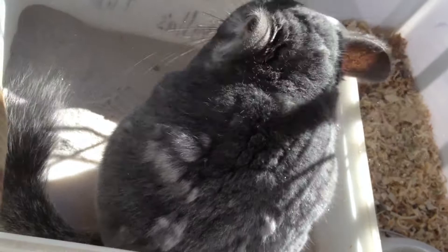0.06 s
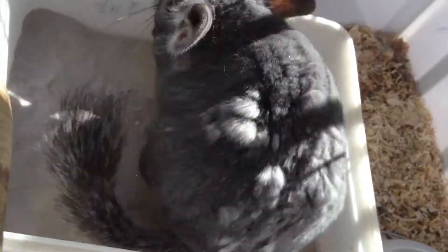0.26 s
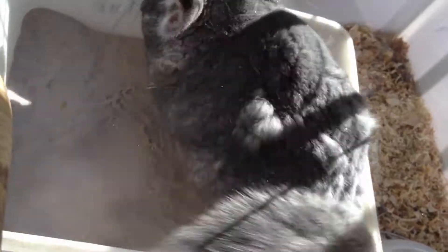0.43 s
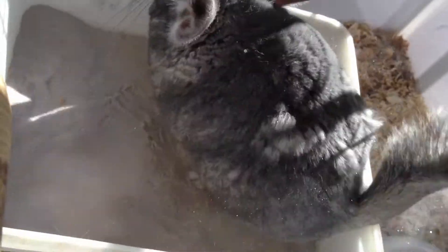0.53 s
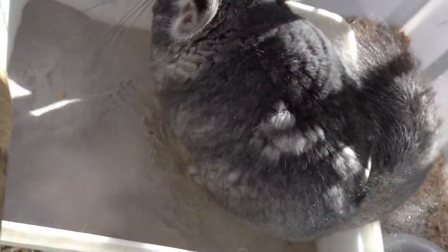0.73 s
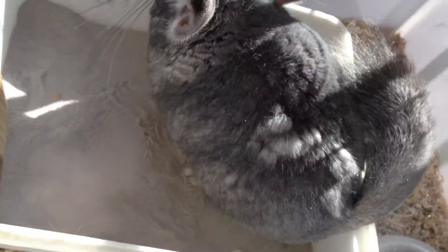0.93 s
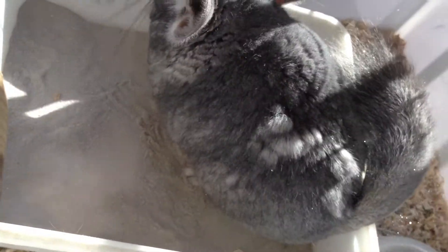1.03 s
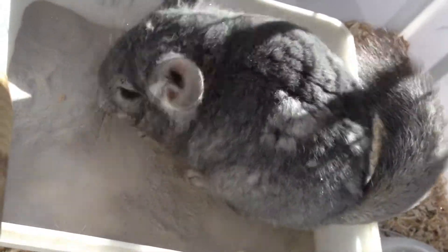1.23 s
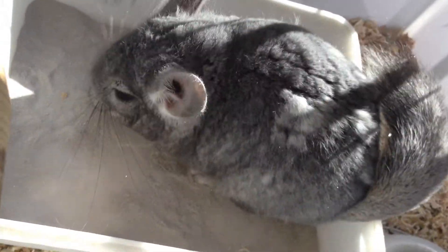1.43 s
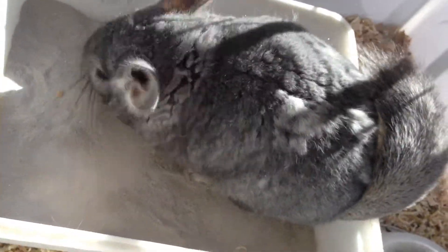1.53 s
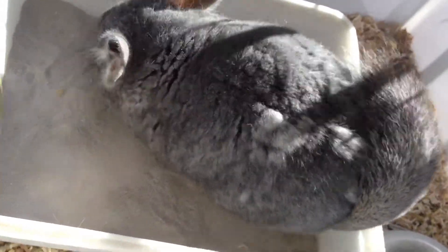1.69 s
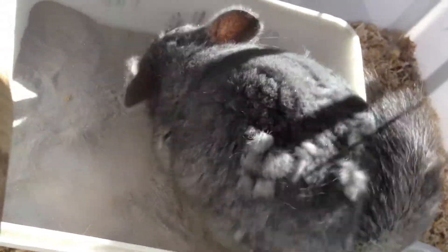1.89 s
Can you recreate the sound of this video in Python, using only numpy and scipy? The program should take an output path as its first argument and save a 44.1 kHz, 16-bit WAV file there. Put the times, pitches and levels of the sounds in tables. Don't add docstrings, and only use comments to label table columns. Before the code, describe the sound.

Animal bumping and shuffling in a plastic tub, with one loud hollow knock and soft dust scuffs.

```python
import sys
import numpy as np
from scipy import signal
from scipy.fft import rfft, irfft, next_fast_len
from scipy.io import wavfile
from scipy.ndimage import map_coordinates

SR = 44100
rng = np.random.default_rng(int(sys.argv[2]) if len(sys.argv) > 2 else 0)


def dump(signal):
    limited = np.clip(np.atleast_2d(signal).T, -1, 1)
    pcm = np.round(limited * 32767).astype(np.int16)
    wavfile.write(sys.argv[1], SR, pcm)


def boost(x):
    u = np.asarray(x, float) / 20
    return 10 ** u


N = 85995
TIME = np.arange(N) / SR


def unit(x):
    return x / np.sqrt(np.mean(x ** 2) + 1e-20)


def noise():
    return rng.standard_normal(N)


def coloured(x, points):
    size = next_fast_len(N + 8192)
    points_hz, points_db = np.transpose(points)
    hz = np.fft.rfftfreq(size, 1 / SR)
    gain_db = np.interp(np.log(hz + 1), np.log(points_hz + 1), points_db, -120, -120)
    return unit(irfft(rfft(x, size) * boost(gain_db), size)[:N])


def curve(rows, col):
    r = np.array(rows)
    return np.interp(TIME, r[:, 0], r[:, col])


def wobble(rate_hz):
    return map_coordinates(rng.standard_normal(int(2 * rate_hz) + 4), [TIME * rate_hz])


def tone(hz):
    return np.sin(2 * np.pi * np.cumsum(hz) / SR)


def ring(start_s, modes, attack_s):
    out = np.zeros(N)
    start = int(start_s * SR)
    t = np.clip(TIME[start:start + SR // 2] - start_s, 0, None)
    total = sum(boost(db - 60 * t / t60) * np.sin(2 * np.pi * hz * t) for hz, db, t60 in modes)
    out[start:start + SR // 2] = total * (1 - np.exp(-t / attack_s))
    return out


# (frequency [Hz], density [dB per Hz])
RUMBLE_COLOUR = [(20, -4), (60, -4), (110, 2), (250, -1), (500, -9.5), (1000, -11.5), (1500, -18.5),
                 (2800, -29.5)]
# (frequency [Hz], density [dB per Hz])
AIR_COLOUR = [(1500, -12), (2500, 0), (5200, -2), (6800, -1.5), (9100, -6.5), (10400, -6.5), (13000, -4),
              (15400, -2.5)]


def outdoors():
    rumble_db = -61 + wobble(24.75) / 2 + wobble(2.4) / 2
    rumble = coloured(noise(), RUMBLE_COLOUR) * boost(rumble_db)
    return rumble + coloured(noise(), AIR_COLOUR) * boost(-74.5)


# (frequency [Hz], level [dB], t60 [s])
TUB_MODES = [(138, -3, .25), (236, -7, .18), (332, -5, .14), (378, -8, .15), (420, -4, .35), (507, -3, .3),
             (590, -5, .12), (645, -7, .08), (700, -12, .1), (900, -14, .12), (1190, -24, .06),
             (1400, -24, .04)]
# (frequency [Hz], level [dB])
RATTLE_COLOUR = [(90, -37), (150, 3), (500, 0.5), (1000, -5), (1700, -19), (3000, -43)]
# (time [s], level [dB])
PRESS = [(0, -61), (.15, -65.5), (.228, -80), (.24, -43.5), (.27, -43.5), (.39, -50.5), (.42, -55.5),
         (.54, -58), (.66, -62), (.7, -54), (.76, -63), (.85, -54), (.92, -62.5), (.96, -70), (1.02, -55.5),
         (1.1, -55.5), (1.13, -72), (1.95, -69.5)]


def paw_pressure():
    loaded_t60_share, rattle_db = 0.75, -8.5
    unevenness = boost(2.9 * wobble(59.88))
    loaded = [(hz, db, t60 * loaded_t60_share) for hz, db, t60 in TUB_MODES]
    body = ring(0, loaded, 0.00026)[:SR // 2]
    pitched = unit(signal.fftconvolve(noise() * unevenness, body)[:N])
    rattle = boost(rattle_db) * coloured(noise() * unevenness, RATTLE_COLOUR)
    return (pitched + rattle) * boost(curve(PRESS, 1))


# (frequency [Hz], density [dB per Hz])
DUST_COLOUR = [(1200, -12.5), (2500, -10.5), (5200, -10.5), (7800, -3), (9150, 0), (10200, -10),
               (12500, -9.5), (15400, -13)]
# (time [s], level [dB])
SWEEP = [(0, -77), (.03, -68), (.155, -62), (.17, -74.5), (.26, -66.5), (.29, -61), (.4, -64), (.44, -66.5),
         (.54, -71.5), (.6, -77.5), (1.1, -76), (1.35, -81), (1.62, -81), (1.72, -64.5), (1.805, -65.5),
         (1.855, -68), (1.88, -55), (1.95, -49.5)]


def dust():
    grains_per_s, grain_db, grain_spread_db = 1100, -8, -1.5
    chance, size, sign = rng.random((3, N))
    grains = (chance < grains_per_s / SR) * boost(-grain_spread_db * np.log(size)) * np.sign(sign - 0.5)
    hiss = noise() * boost(2.25 * wobble(40.12))
    return coloured(hiss + boost(grain_db) * unit(grains), DUST_COLOUR) * boost(curve(SWEEP, 1))


# (frequency [Hz], level [dB])
CLAW_COLOUR = [(4000, -22), (6200, -3.5), (9100, 0.5), (10500, -8), (13500, -7.5), (15400, -8)]
# (frequency [Hz], level [dB])
SHAVINGS_COLOUR = [(900, -25), (1800, 6.5), (4500, -1), (6000, -2)]
# (time [s], level [dB], length [s], dull share [dB])
SCUFFS = [(0.036, -57.5, 0.0016, -14), (.099, -55.5, 0.0033, -8), (0.284, -54, 0.0017, -21),
          (0.294, -55, 0.0022, -26), (0.317, -59.5, 0.0077, -2.5), (0.362, -60, 0.0029, -21),
          (0.367, -58.5, 0.0082, -7), (0.383, -60, 0.0075, -0.5), (0.464, -59.5, 0.011, -5),
          (0.523, -66.5, 0.0077, -8), (0.803, -60, 0.0037, -8.5), (0.8531, -56, 0.0056, -10.5),
          (0.8864, -56, 0.0029, -7), (.897, -57.5, 0.0023, -7), (1.02, -69, 0.003, 1.5),
          (1.071, -77.5, .005, 8), (1.081, -75, 0.0025, 2), (1.167, -68.5, 0.024, -11),
          (1.245, -60.5, 0.0046, -9.5), (1.284, -64, 0.009, -6.5), (1.62, -66.5, .004, -26),
          (1.69, -78, 0.0031, -28), (1.716, -58, 0.0036, -7)]


def claw_scuffs():
    attack_s, release_share = 0.001, 0.84
    grit = boost(2.5 * wobble(1500))
    bright = coloured(noise() * grit, CLAW_COLOUR)
    dull = coloured(noise() * grit, SHAVINGS_COLOUR)
    out = np.zeros(N)
    for start_s, db, length_s, dull_db in SCUFFS:
        t = TIME - start_s
        rise = np.clip(t / attack_s, 0, 1)
        fall = np.exp(-np.clip(t - length_s, 0, None) / (release_share * length_s / 2))
        out += boost(db) * rise * fall * (bright + boost(dull_db) * dull)
    return out


# (frequency [Hz], level [dB], t60 [s])
CONTACT_MODES = [(950, -9.5, 0.0053), (1890, -16, .003), (3400, -21, .002)]
# (time [s], level [dB], frequency [Hz], t60 [s])
PAW_FALLS = [(.133, -63, 178, 0.056), (.4645, -39, 800, 0.023), (.53, -42, 200, 0.045),
             (0.6984, -40.5, 570, 0.009), (.8035, -47, 600, .015), (1.069, -47, 483, 0.018),
             (1.082, -48, 560, 0.013), (0.854, -37.5, 351, 0.054), (0.857, -40, 495, 0.088),
             (.888, -37.5, 510, 0.018), (.865, -45.5, 138.6, 0.16), (1.014, -41, 344, 0.019),
             (1.025, -44.5, 163, 0.078), (1.094, -39, 340, 0.031), (1.2471, -43.5, 602, 0.02),
             (1.284, -45.5, 526, 0.016), (1.498, -47.5, 249, 0.05), (1.69, -49, 596, 0.031),
             (1.787, -41, 243, 0.061), (1.868, -48.5, 250, 0.013)]


def paw_falls():
    tub_db = -22
    out = np.zeros(N)
    for start_s, db, hz, t60 in PAW_FALLS:
        thump = [(hz, db, t60), (hz * 1.64, db - 12.0, t60 / 2), (hz * 3.0, db - 11.5, t60 / 3)]
        out += ring(start_s, thump, 0.00051)
        out += boost(db + tub_db) * ring(start_s, TUB_MODES, 0.0024)
        out += boost(db) * ring(start_s, CONTACT_MODES, 0.00022)
    return out


# (delay [s], level [dB])
REBOUNDS = [
    (.0067, -9),
    (.0084, -13),
    (.0222, -18),
]
# (frequency [Hz], level [dB], t60 [s])
FLOOR_BOOM = (147, -26, .075)


def knock():
    knock_s, knock_db, knock_hz, knock_t60_s = 0.22992, -7, 574, 0.0071
    snap_db, ring_db, boom_lag_s = -23.5, -27, 0.0018
    free_t60_share = 0.46
    pulse = [(knock_hz, knock_db, knock_t60_s)]
    snap = [(1500, snap_db, 0.002), (3300, snap_db + 1.5, 0.001), (6300, snap_db - 13, 0.001)]
    out = -ring(knock_s, pulse + snap, 0.000093)
    for delay_s, db in REBOUNDS:
        out += ring(knock_s + delay_s, [(knock_hz, knock_db + db, knock_t60_s)], 0.00069)
    damped = [(hz, db, t60 * free_t60_share) for hz, db, t60 in TUB_MODES[1:]]
    out += boost(ring_db) * ring(knock_s, damped, 0.0043)
    return out + ring(knock_s + boom_lag_s, [FLOOR_BOOM], 0.0026)


# (time [s], length [s], frequency [Hz], level [dB])
WALL_HUMS = [(0.253, 0.058, 510.5, -45.5), (0.26, 0.04, 600, -44.5), (0.249, .05, 350, -48),
             (.26, 0.091, 378, -50), (.255, 0.069, 425, -47.5), (.258, 0.03, 134, -48.5),
             (.305, 0.039, 141.7, -46), (0.29, 0.092, 240, -51), (.32, 0.048, 500, -47),
             (0.35, 0.064, 418, -50.5), (0.35, 0.047, 870, -56), (0.36, .03, 720, -54.5),
             (.38, 0.034, 139, -51), (.435, 0.075, 136, -51.5), (0.48, 0.078, 413, -53.5),
             (0.513, .08, 345, -60), (.48, 0.033, 290, -57), (.3, .045, 600, -54), (0.29, .04, 900, -53),
             (.675, .08, 380, -58), (.69, .04, 430, -55), (.69, .09, 138, -63), (0.802, 0.032, 390, -61),
             (.82, 0.053, 510, -53), (.88, 0.038, 381, -55.5), (.955, 0.044, 375, -59.5),
             (.893, .035, 522, -50), (1.04, 0.028, 502, -59)]


def rocking():
    edge_s, rough_db, rough_rad = 0.011, 1.5, 0.3
    out = np.zeros(N)
    for start_s, length_s, hz, db in WALL_HUMS:
        t = TIME - start_s
        swell = np.clip(np.minimum(t, length_s - t) / edge_s, 0, 1)
        level = boost(db + rough_db * wobble(70))
        out += level * swell * np.sin(2 * np.pi * hz * t + rough_rad * wobble(49.8))
    return out


# (time [s], level [dB], frequency [Hz])
TICKS = [(.2935, -57, 9300), (.4647, -53, 2300), (.621, -67, 9000), (.8035, -58, 9150), (.6988, -56, 2150),
         (.699, -63, 3700), (.804, -62, 1900), (1.021, -62, 1800), (1.069, -60, 1900), (1.084, -62, 2000),
         (.8555, -54, 9100), (.8885, -55, 9200), (.472, -58, 4800), (1.246, -63, 6500), (1.285, -63, 7600),
         (1.6215, -61, 14000), (1.6755, -65, 11500), (1.6845, -60, 14200)]


def grit_ticks():
    return sum(ring(start_s, [(hz, db, 0.012), (hz * 0.88, db + 1.5, 0.008)], 0.00037)
               for start_s, db, hz in TICKS)


# (frequency [Hz], level [dB], t60 [s])
WIRE_MODES = [(7950, 0, .12), (8820, 2, .12), (10600, -2, .11)]
# (time [s], level [dB])
PINGS = [
    (.803, -71),
    (.855, -71),
    (.889, -63),
]


def wire_clip():
    return sum(boost(db) * ring(start_s, WIRE_MODES, 0.0011) for start_s, db in PINGS)


# (time [s], frequency [Hz], level [dB])
SQUEAK = [
    (.89, 8900, -77),
    (.935, 8620, -74),
    (.952, 8260, -65.5),
    (.966, 8140, -84),
    (.975, 8250, -66),
    (.995, 8100, -71),
    (1.008, 7900, -88),
    (1.03, 7400, -83),
    (1.055, 7300, -92),
]


def rim_squeak():
    on = (TIME > SQUEAK[0][0]) * (TIME < SQUEAK[-1][0])
    level_db = curve(SQUEAK, 2) + 0.5 + 1.5 * wobble(170)
    return on * boost(level_db) * tone(curve(SQUEAK, 1))


# (time [s], frequency [Hz], level [dB])
BIRD = [
    (.89, 4250, -81),
    (.92, 4440, -70),
    (.955, 4370, -76),
    (.965, 4400, -79),
    (.985, 4500, -69.5),
    (1.015, 4380, -75),
    (1.04, 4230, -91.5),
]


def far_bird():
    return boost(curve(BIRD, 2) + 2.5 * wobble(200)) * tone(curve(BIRD, 1) + 90 * wobble(500))


# (frequency [Hz], level [dB], t60 [s])
CHIP_MODES = [(2100, -8.5, 0.019), (3510, -2, 0.014), (4410, -6, 0.015), (8680, 1, 0.016),
              (11200, -3, .012), (13400, -6, .008)]


def chip_snap():
    chip_s, chip_db = 1.712, -43.5
    return boost(chip_db) * ring(chip_s, CHIP_MODES, 0.00035)


# (time [s], level [dB])
SLIDE = [
    (1.84, -68),
    (1.885, -54.5),
    (1.92, -55),
    (1.95, -54),
]
# (frequency [Hz], level [dB])
SLIDE_COLOUR = [(250, -41), (550, 3), (950, 2), (1300, -15), (3500, -17), (5000, -21)]


def last_slide():
    friction = noise() * boost(2.9 * wobble(59.88))
    return boost(curve(SLIDE, 1)) * coloured(friction, SLIDE_COLOUR)


def scene():
    tub = paw_pressure() + paw_falls() + knock() + rocking() + last_slide()
    small = dust() + claw_scuffs() + grit_ticks() + wire_clip() + rim_squeak() + chip_snap()
    return (outdoors() + tub + small + far_bird())[None]


def low_pass(x):
    return signal.sosfilt(signal.butter(12, 15490, fs=SR, output="sos"), x)


def record(dry):
    mic_low_hz, top_hz = 107, 15480
    bass_cut = signal.butter(4, mic_low_hz, "high", fs=SR, output="sos")
    heard = signal.sosfilt(bass_cut, dry)
    heard = irfft(rfft(heard) * (np.fft.rfftfreq(N, 1 / SR) < top_hz), N)
    return low_pass(heard)


dry = scene()
out = record(dry)
dump(out)
```